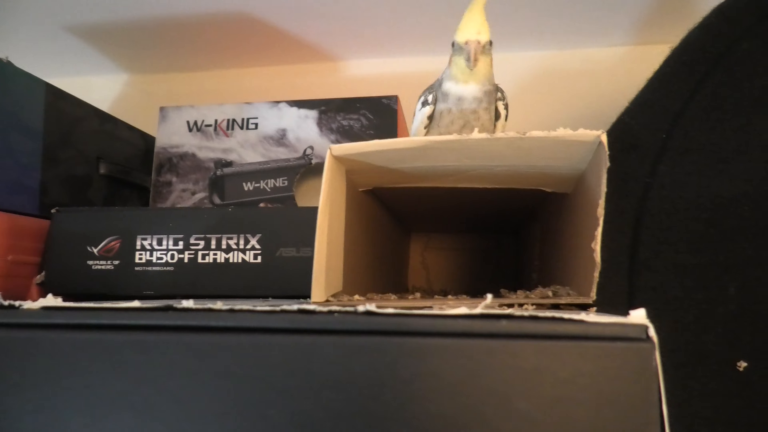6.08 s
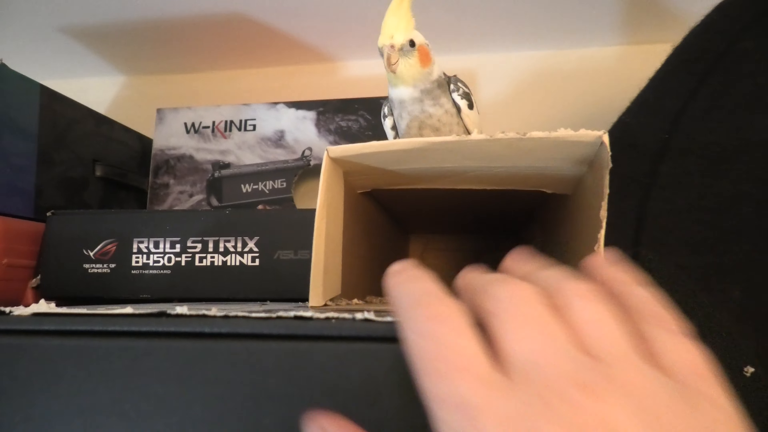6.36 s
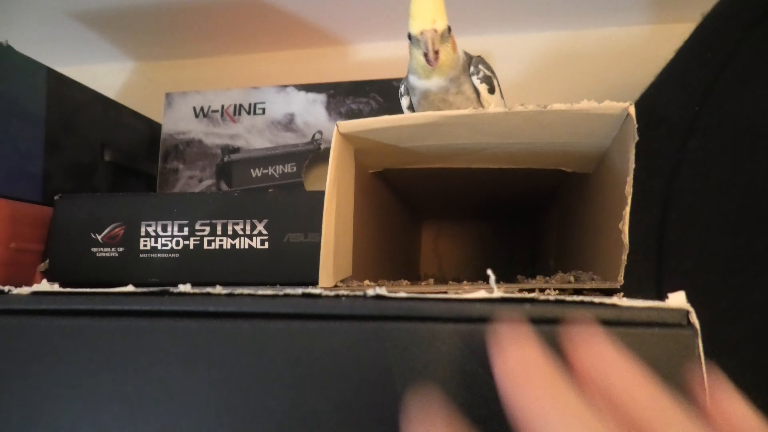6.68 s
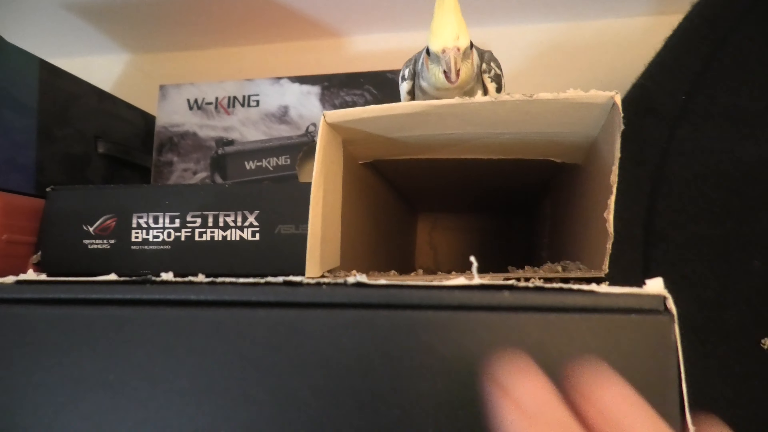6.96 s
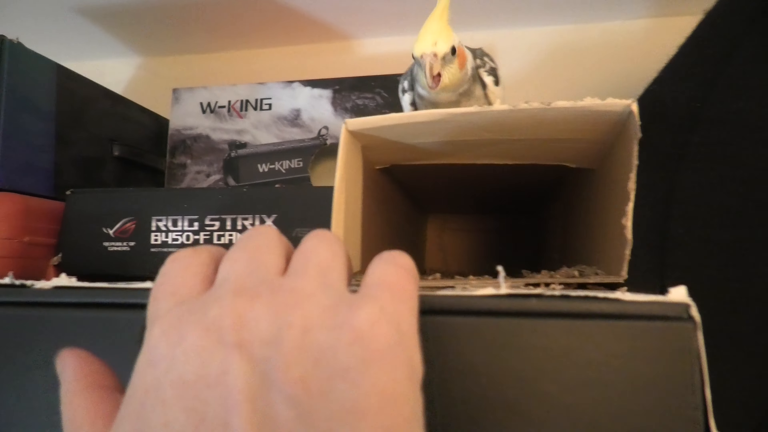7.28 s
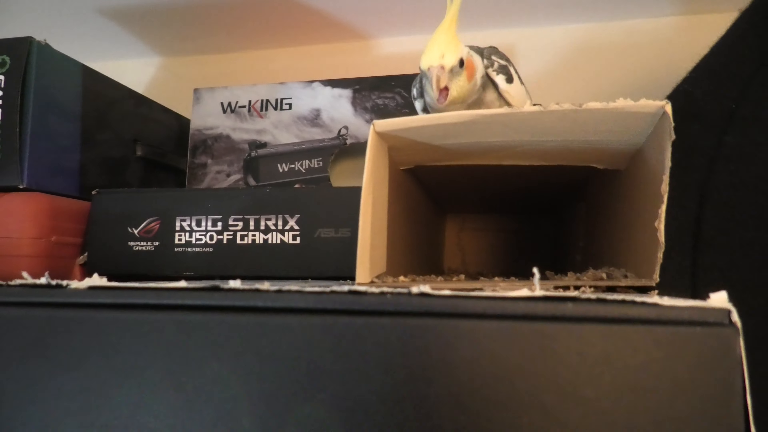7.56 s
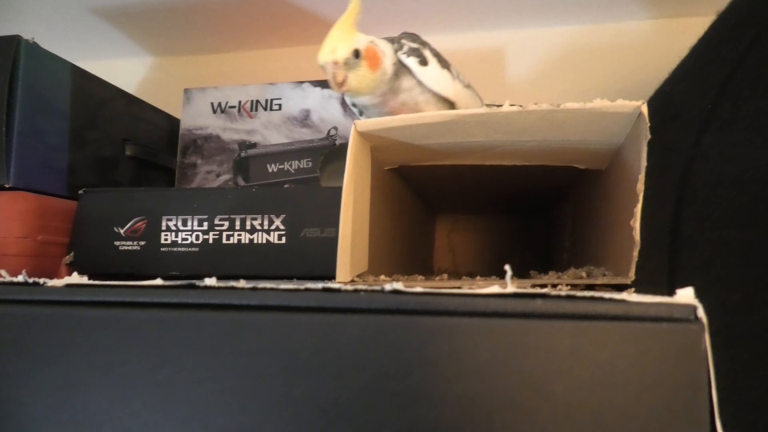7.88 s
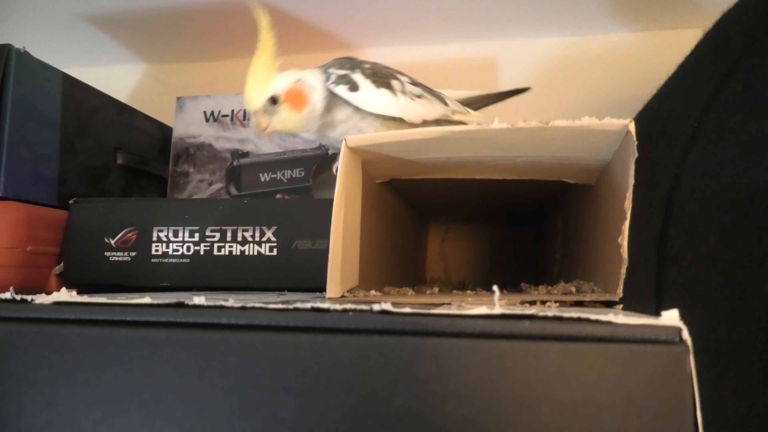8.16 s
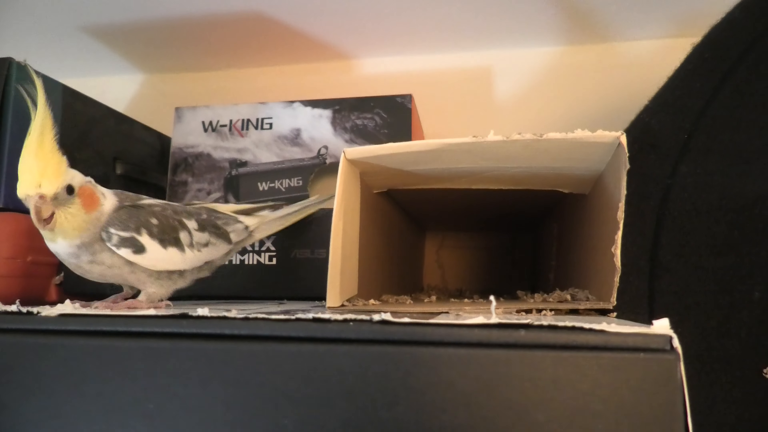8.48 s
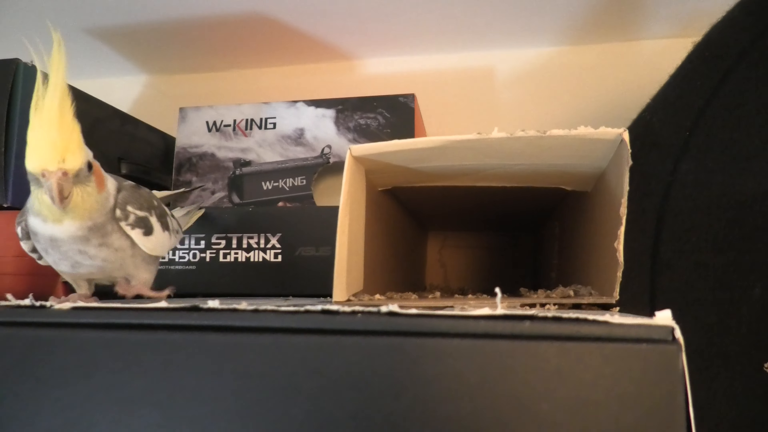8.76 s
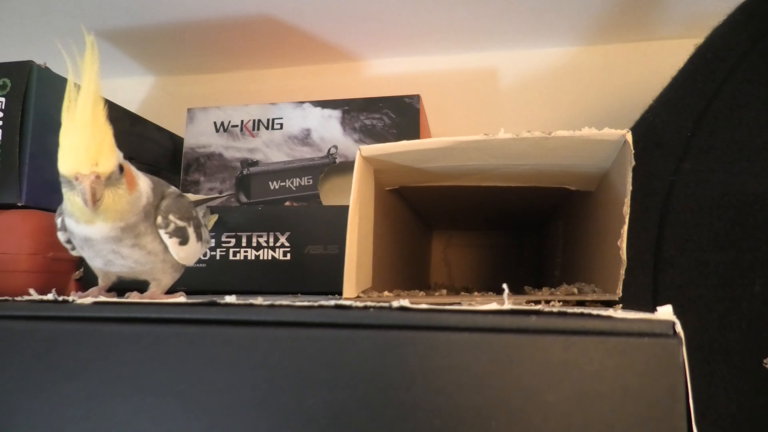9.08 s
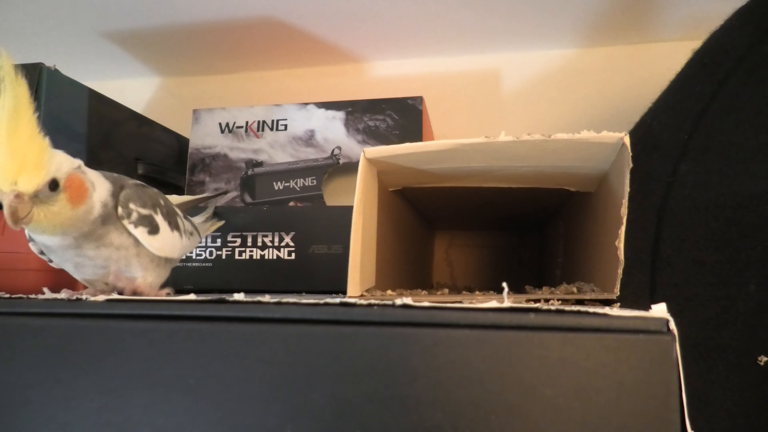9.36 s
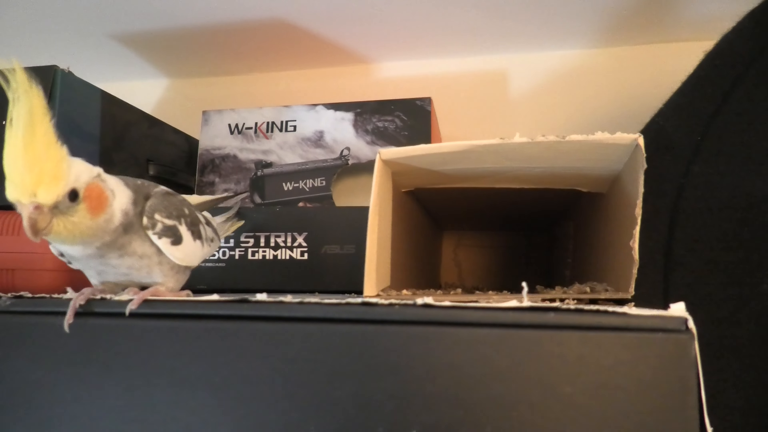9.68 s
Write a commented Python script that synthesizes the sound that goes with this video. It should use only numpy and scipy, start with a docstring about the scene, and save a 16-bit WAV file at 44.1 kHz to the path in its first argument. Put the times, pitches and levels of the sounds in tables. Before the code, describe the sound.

Close, irregular beak taps, papery scratches and crackling bites on cardboard as a bird chews in a quiet room.

```python
"""Sharp pecks on a cardboard box: a cockatiel nibbling close to a stereo microphone in a small quiet room.
The beak slides over the paper, bites through crackling fibres and knocks on the panel, almost straight
ahead. Now and then the whole box thumps softly, and later on stiff fibres snap.
The room rings briefly around the bird, over a steady fan-like hum."""
import sys
import numpy as np
from scipy import signal
from scipy.fft import rfft, irfft
from scipy.io import wavfile
from scipy.ndimage import uniform_filter1d

SR = 44100
rng = np.random.default_rng(int(sys.argv[2]) if len(sys.argv) > 2 else 0)


def bounce(signal):
    """Save signal as a 16-bit WAV file at the path given by the first command-line argument."""
    frames = np.transpose(np.atleast_2d(signal))
    limited = np.clip(frames, -1, 1)
    pcm = np.round(limited * 32767).astype(np.int16)
    wavfile.write(sys.argv[1], SR, pcm)


N = 433062

# modes of the cardboard: f/Hz, level/dB, t60/s
BOARD_MODES = [(137.5, 7, 0.033), (236, -9.5, 0.06), (293, -4, 0.037), (395, 7.5, 0.037), (570, -31, 0.018),
               (692, -5.5, 0.067), (727, 8, 0.015), (871, -9, 0.05), (933, 0.5, 0.038), (1060, -10, .022),
               (1270, -32, .02), (1462, 2.5, 0.052), (1620, -8, 0.013), (1800, 4, 0.012),
               (2060, -4.5, 0.021), (2414, -4.5, 0.031), (3020, -0.5, 0.038)]
# spectrum of breaking fibres: f/Hz, level/dB
CRUNCH_SPECTRUM = [(300, -60), (1500, -14), (3000, -13), (4500, -4), (6500, 1), (9000, 3.5), (12000, 1.5),
                   (14000, -8), (16000, -0.5)]
PRESS_S = .008  # the beak presses this long before it bites


def amp(db):
    """Decibels to gain."""
    return 10 ** (np.asarray(db) / 20)


def unit_rms(x):
    """Scales to rms 1."""
    return x / np.sqrt(np.mean(x ** 2) + 1e-20)


def at_level(x, db):
    """Scales a blow so that its energy equals 10 ms at this level."""
    return amp(db) * x / np.sqrt(np.sum(x ** 2) / (SR / 100) + 1e-20)


def curve(points, hz, column=1):
    """Interpolates one column of a table along log frequency."""
    table = np.transpose(points)
    return np.interp(np.log(hz + 1), np.log(table[0] + 1), table[column])


def add(mix, s, sound):
    """Mixes a sound in at time s."""
    start = round(s * SR)
    sound = sound[max(-start, 0):]
    part = mix[max(start, 0):][:len(sound)]
    part += sound[:len(part)]


def seconds(size):
    """A time axis."""
    return np.arange(size) / SR


def bandpass(x, low_hz, high_hz):
    """Keeps one band, with gentle slopes."""
    return signal.sosfilt(signal.butter(2, [low_hz, high_hz], "band", fs=SR, output="sos"), x)


def coloured(x, spectrum, tilt_db=0):
    """Minimum-phase filter with a given spectrum, tilted per octave above 2 kHz."""
    hz = abs(np.fft.fftfreq(1024, 1 / SR))
    octaves = np.log2(np.maximum(hz, 2000) / 2000)
    log_gain = np.log(amp(curve(spectrum, hz) + tilt_db * octaves))
    taps = np.fft.ifft(np.exp(np.conj(signal.hilbert(log_gain)))).real
    return signal.fftconvolve(x, taps)[:len(x)]


def swell(t, peak_s, steep):
    """Rises to 1 at peak_s, then dies away."""
    u = t / peak_s
    return (u * np.exp(1 - u)) ** steep


def fibre_breaks(size, spread_db):
    """Tiny fibre breaks: noise whose strength jumps every 12 samples."""
    return rng.standard_normal(size) * amp(spread_db * np.repeat(rng.standard_normal(size), 12)[:size])


def bite(rise_s, steep, press, spread_db):
    """The beak presses in for a moment, then a cluster of fibres gives way."""
    t = seconds(4096) - PRESS_S
    pressing = press * np.exp(-abs(t) / 0.0015)
    return fibre_breaks(len(t), spread_db) * (pressing + swell(np.maximum(t, 0), rise_s, steep))


def paper_edge(x, lift, width_hz):
    """Each torn edge of paper has a few shrill resonances of its own."""
    out = x
    for hz in np.geomspace(2100, 11500, 7) * rng.uniform(.86, 1.14, 7):
        out = out + lift * rng.random() * signal.lfilter(*signal.iirpeak(hz, hz / width_hz, fs=SR), x)
    return out


def cardboard(force, centre_hz, octaves):
    """The board rings; where the beak lands shifts its modes a little and decides which take the blow."""
    t = seconds(len(force))
    response = np.zeros(len(t))
    for hz, db, t60 in BOARD_MODES:
        shift = rng.uniform(.96, 1.04)
        share = 1 / (1 + (np.log2(hz / centre_hz) / octaves) ** 4)
        response += share * amp(db - 60 * t / t60) * np.cos(2 * np.pi * hz * shift * t)
    return signal.fftconvolve(force, response)[:len(t)]


def peck(thud_db, knock_db, knock_hz, clack_db, crunch_db, rise_s=.002):
    """The breaking fibres crunch; the panel and, more slowly, the box answer."""
    fibres = coloured(bite(rise_s, steep=0.99, press=0.092, spread_db=1.5), CRUNCH_SPECTRUM)
    crunch = paper_edge(fibres, lift=1.35, width_hz=280)
    clack = cardboard(bite(rise_s, steep=2.1, press=0.64, spread_db=8), 2160, octaves=0.37)
    knock = cardboard(bite(1.28 * rise_s, steep=1.22, press=0.74, spread_db=4), knock_hz, octaves=0.27)
    thud = cardboard(bite(3.84 * rise_s, steep=1.96, press=0.29, spread_db=0.5), 171, octaves=0.98)
    # the soft panel passes on little treble
    knock = at_level(bandpass(knock, 380, 1900), knock_db)
    thud = at_level(bandpass(thud, 60, 480), thud_db)
    return at_level(crunch, crunch_db) + at_level(clack, clack_db) + knock + thud


def pecking():
    """The beak slides to a hold, then bites; knock and crunch set all the levels of a peck."""
    # bites: t/s, knock level/dB, knock f/Hz, crunch level/dB, slide beforehand/s
    pecks = [(0.0, -26.5, 880, -29, 0.0044), (0.0839, -25.5, 890, -23, 0.029),
             (0.169, -23, 1020, -28, 0.00086), (0.327, -27.5, 820, -31.5, 0.011),
             (0.919, -30.5, 770, -47, 0.0047), (1.102, -40.5, 885, -56, 0.00096),
             (1.5126, -31, 946, -46, 0.0069), (2.728, -37, 900, -64, 0.013), (2.952, -36, 910, -59, 0.0073),
             (3.302, -44, 845, -62, 0), (3.619, -41, 830, -62, 0.001), (4.08, -26, 911, -25, .016),
             (4.228, -32, 755, -21.5, 0.0045), (4.471, -31.5, 871, -51.5, 0.0085),
             (5.507, -40, 745, -52, .055), (5.521, -42, 788, -45, 0.0052),
             (5.676, -28.5, 790, -34.5, 0.011), (5.87, -33, 847, -60, 0.00047), (6.017, -34, 695, -64, 0),
             (6.039, -44.5, 776, -57, 0.0082), (6.236, -41, 800, -60, 0.0038), (6.251, -47, 743, -49.5, 0),
             (6.451, -32, 674, -64, 0), (7.065, -41, 870, -59, 0.00044), (7.074, -47, 766, -46, 0.0017),
             (7.371, -31, 813, -43, 0.016), (7.667, -32, 785, -53, 0.0011), (7.681, -31.5, 755, -62, 0.001),
             (7.788, -29, 854.4, -29.5, 0.023), (7.97, -33, 770, -41.5, 0.02),
             (8.064, -39.5, 786, -36.5, 0.014), (8.196, -35, 766, -44.5, 0.016),
             (8.427, -36, 597, -22, .045), (8.53, -42, 1550, -31.5, 0.018),
             (8.857, -53.5, 1500, -52, 0.0064), (9.23, -54, 1710, -66, 0.005)]
    # the other parts: level in an average peck/dB, dB per dB of knock, dB per dB of crunch
    thud = (-41, 0.4, 0.13)
    clack = (-42.5, 1, 0.32)
    slide_rasp = (-48.5, 0.79, 0.23)
    slide_murmur = (-49.5, 1, 0.035)
    average_knock_db, average_crunch_db = -34, -42
    out = np.zeros(N)
    for s, knock_db, knock_hz, crunch_db, slide_s in pecks:
        thud_db, clack_db, rasp_db, murmur_db = (
            db + per_knock * (knock_db - average_knock_db) + per_crunch * (crunch_db - average_crunch_db)
            for db, per_knock, per_crunch in (thud, clack, slide_rasp, slide_murmur))
        add(out, s - PRESS_S, peck(thud_db, knock_db, knock_hz, clack_db, crunch_db))
        if slide_s > 0:
            add(out, s - slide_s - .003, scrape(slide_s, rasp_db, murmur_db))
    return out


def scrape(length_s, rasp_db, murmur_db):
    """A dense run of fibre slips under uneven pressure; the paper rasps and the panel murmurs."""
    # spectrum of rubbed paper: f/Hz, level/dB
    rub_spectrum = [(200, -29), (1400, 4), (2300, 3), (3700, 0), (5000, 1.5), (7000, 4), (11500, 3.5),
                    (13500, 1.5), (16000, -3.5)]
    t = seconds(int((max(length_s, .004) + 0.0077) * SR))
    pressure = amp(1.9 * unit_rms(uniform_filter1d(rng.standard_normal(SR), 260))[:len(t)])
    stroke = fibre_breaks(len(t), spread_db=3) * pressure * signal.windows.tukey(len(t), .75)
    # a beak that skims sounds brighter than one that leans on the panel
    slips = coloured(stroke, rub_spectrum, tilt_db=0.1 * (rasp_db - murmur_db - 7))
    lift = 5.8 / (1 + (length_s / 0.041) ** 2)  # short nips squeak, long strokes hiss evenly
    # the beak slides from one paper edge to the next, so the resonances shift
    slide = np.sin(np.pi * t / .07) ** 2
    rasp = sum(share * paper_edge(slips, lift, width_hz=390) for share in (1 - slide, slide))
    murmur = cardboard(stroke, 1000, octaves=0.74)
    return amp(rasp_db) * unit_rms(rasp) + amp(murmur_db) * unit_rms(murmur)


def room_tone(level_db=-52.5):
    """Steady air noise with a few narrow, fan-like hums, much alike in both channels."""
    # air noise: f/Hz, level/dB
    air = [(15, -61), (25, -21.5), (75, -3.5), (136, -8), (178, -2.5), (240, -9), (267, -6.5), (389, -11.5),
           (421, -9.5), (1020, -9), (2850, -23.5), (3260, -25.5), (5580, -36), (10400, -28), (15500, -29.5)]
    # humming resonances and one dip: f/Hz, width/Hz, gain/dB
    hums = [(91, 8.4, 6.5), (137.6, 13.7, 10.5), (239.4, 11.2, 14), (391.5, 13.4, 8.5), (920, 28, -2.5),
            (3160, 32, 12)]
    # left-right likeness: f/Hz, coherence/0-1
    likeness = [(60, 0.9), (150, 0.74), (380, 0.75), (950, 0.82), (2380, 0.35), (5980, 0.83), (15000, 0.7)]
    hz = np.fft.rfftfreq(N, 1 / SR)
    hum_db = sum(db / (1 + (2 * (hz - f) / width) ** 2) for f, width, db in hums)
    mid, side = rfft(rng.standard_normal((2, N))) * amp(curve(air, hz) + hum_db)
    coherence = curve(likeness, hz)
    side *= np.sqrt((1 - coherence) / (1 + coherence))
    mid, side = irfft(mid, N), irfft(side, N)
    return amp(level_db) * np.array([mid + side, mid - side]) / np.std(mid)


def thump(db, hz, half_s):
    """The box flexes through a few slow swings, centred 50 ms in, and shudders as it does."""
    t = seconds(round(.1 * SR)) - .05
    flex = np.exp(-(t / half_s) ** 2)
    shudder = np.sqrt(flex) * bandpass(rng.standard_normal(len(t)), 50, 220)
    return at_level(flex * np.sin(2 * np.pi * hz * t), db) + at_level(shudder, db - 8.5)


def snap(db, hz):
    """A stiff fibre starts to splinter, then breaks 1 ms later with one very short, high ring."""
    t = seconds(1024)
    tick = swell(t, peak_s=.0001, steep=1.4) * np.sin(2 * np.pi * hz * t)
    splinters = coloured(fibre_breaks(len(t), spread_db=2) * np.exp(-t / .005), CRUNCH_SPECTRUM)
    splinters = signal.lfilter(*signal.iirpeak(hz, 1.3, fs=SR), splinters)
    return at_level(np.roll(tick, round(.001 * SR)), db) + at_level(splinters, db - 5)


def diffuse(x, above_hz, wander_hz, smooth_samples):
    """A diffuse echo: a fast random wander in pitch leaves no steady tones in its upper band."""
    spectrum = rfft(x) / (1 + (above_hz / (np.fft.rfftfreq(N, 1 / SR) + 1)) ** 8)
    upper, quarter_turn = irfft(spectrum, N), irfft(spectrum * -1j, N)
    shift_hz = wander_hz * unit_rms(uniform_filter1d(rng.standard_normal(N), smooth_samples))
    phase = 2 * np.pi * np.cumsum(shift_hz) / SR
    return x - upper + upper * np.cos(phase) - quarter_turn * np.sin(phase)


def room_echo(x):
    """Close boxes and walls throw back a dense early cluster; each band then dies at its own speed."""
    # reverberation: f/Hz, t60/s, level/dB, side-to-mid width/dB
    reverb = [(100, 0.25, -12, -29), (316, 0.32, 2, -6), (900, 0.5, -10, -5), (2170, 0.38, -7, -6.5),
              (6400, 0.3, -9.5, -14), (14000, 0.25, -12, -8)]
    age = seconds(SR)
    envelope = np.clip((age - .002) / 0.00067, 0, 1) * (1 + 0.6 * np.exp(-age / 0.012))
    reflections = rng.choice([-1., 1.], (2, SR)) * envelope
    hz, t, bands = signal.stft(reflections, SR, nperseg=256)
    t60 = curve(reverb, hz)[:, None]
    bands *= amp(curve(reverb, hz, column=2)[:, None] - 60 * t / t60)
    bands *= np.sqrt(np.log(1e6) / t60 / SR)  # a longer decay adds no energy
    bands[1] *= amp(curve(reverb, hz, column=3))[:, None]
    response = signal.istft(bands, SR, nperseg=256)[1]
    mid, side = signal.fftconvolve(x[None], response, axes=1)[:, :N]
    mid = diffuse(mid, above_hz=2800, wander_hz=160, smooth_samples=200)
    mid = diffuse(mid, above_hz=300, wander_hz=45, smooth_samples=500)
    return np.array([mid + side, mid - side])


def scene():
    """The bird works close to the microphone, in the centre, with the small room around it."""
    # separate strokes of the beak over the paper, some alone, some running into a bite:
    # t/s, length/s, rasp level/dB, murmur level/dB
    scrapes = [(0.105, 0.053, -45.5, -55), (0.467, 0.0041, -56.5, -57), (0.785, .034, -70, -63),
               (0.896, 0.0076, -57, -52.5), (1.014, 0.015, -42.5, -53), (1.076, 0.014, -49, -52),
               (2, .079, -79, -55), (2.686, 0.011, -57, -63), (3.193, 0.045, -60, -59),
               (3.243, 0.015, -47.5, -59), (3.26, 0.03, -45.5, -54), (4.193, 0.016, -41, -55),
               (4.43, 0.014, -51, -52), (5.018, 0.053, -69, -61), (5.33, .011, -44, -42.5),
               (5.344, 0.014, -47, -60), (5.604, 0.046, -45.5, -51), (5.69, .094, -50.5, -48.5),
               (5.757, 0.075, -45.5, -48.5), (5.921, 0.03, -44.5, -55), (6.107, .01, -54.5, -67),
               (6.152, 0.05, -63, -51), (6.395, 0.084, -42, -52.5), (6.445, .12, -48.5, -71),
               (6.555, 0.16, -52, -70), (7.039, 0.016, -41, -44.5), (7.276, 0.017, -44, -57),
               (7.287, .073, -51.5, -68), (7.395, .12, -48, -80), (7.61, 0.029, -39.5, -56),
               (7.64, 0.021, -41.5, -47), (7.846, .028, -49.5, -51), (8.117, 0.0093, -50, -55),
               (8.153, 0.012, -56, -59), (8.249, 0.011, -52.5, -56), (8.262, 0.064, -41.5, -50),
               (8.687, 0.017, -55, -83), (9.188, .013, -51, -61)]
    # stiff fibres snapping: t/s, level/dB, f/Hz
    snaps = [(4.1718, -41.5, 5570), (5.339, -40, 12200), (8.425, -28.5, 7900), (8.4291, -46, 8590),
             (8.532, -36, 9400), (8.613, -48.5, 8430), (8.7109, -34.5, 9500), (8.8589, -39, 8540),
             (9.427, -50, 10850)]
    # soft thumps of the box: centre t/s, level/dB, f/Hz, half length/s
    thumps = [(0.056, -19, 119, 0.0081), (0.087, -26, 93, 0.016), (4.189, -30.5, 103, .0086),
              (5.346, -23.5, 114, 0.0084), (5.364, -27.5, 140, 0.0054), (7.295, -23.5, 106.9, 0.009),
              (7.463, -40, 116, 0.018), (7.67, -28.5, 163, 0.0043), (8.434, -34.5, 120.5, 0.0031),
              (8.538, -37, 158, 0.0066), (8.861, -45, 126, 0.0085), (9.24, -43.5, 132, 0.011)]
    bird = pecking()
    for s, *row in scrapes:
        add(bird, s - .003, scrape(*row))
    for s, *row in snaps:
        add(bird, s - .001, snap(*row))
    for s, *row in thumps:
        add(bird, s - .05, thump(*row))
    return bird + room_echo(bird) + room_tone()


def record(dry):
    """The microphone's two ports hear slightly different colours, and nothing above about 16 kHz."""
    # port mismatch: f/Hz, left minus right level/dB, left lead/rad
    ports = [(100, -0.6, 0.1), (300, -1.6, -0.25), (700, -0.8, -0.15), (1800, 0.5, -0.42),
             (3000, 0.3, 0.12), (4000, .6, -0.45), (7000, -0.6, -0.2), (10000, 1.0, -.03),
             (12600, 2.6, 0.51), (15400, 0, 0.73)]
    hz = np.fft.rfftfreq(N, 1 / SR)
    lean = np.sqrt(amp(curve(ports, hz)) * np.exp(1j * curve(ports, hz, column=2)))
    stereo = irfft(rfft(dry) * np.array([lean, 1 / lean]), N)
    lowpass = signal.firwin(401, 15850, window=("kaiser", 9), fs=SR)
    return signal.oaconvolve(stereo, lowpass[None], "same")


dry = scene()
out = record(dry)
bounce(out)
```